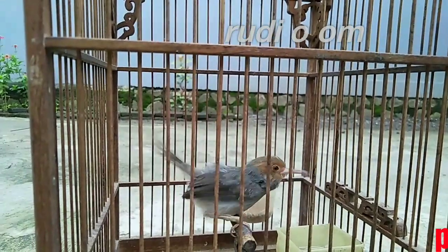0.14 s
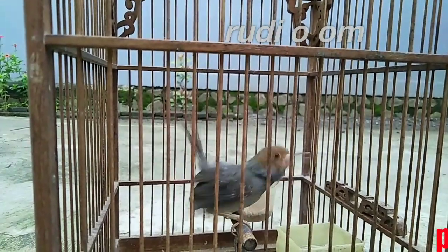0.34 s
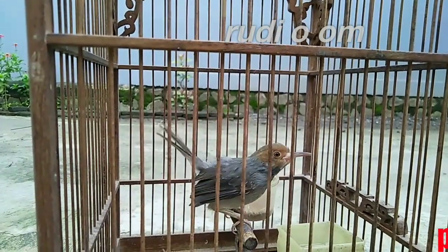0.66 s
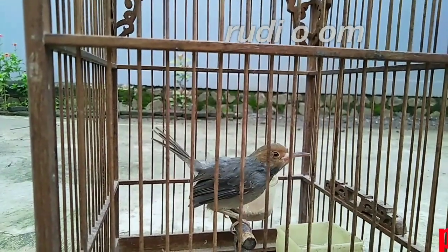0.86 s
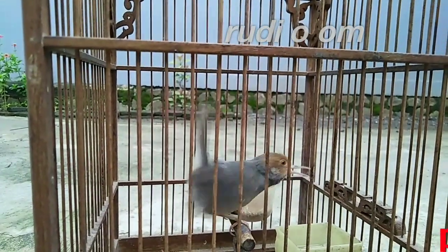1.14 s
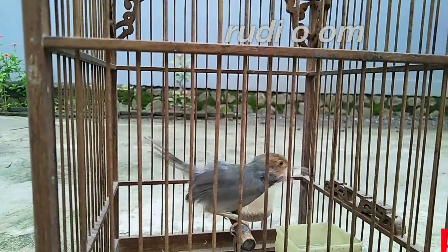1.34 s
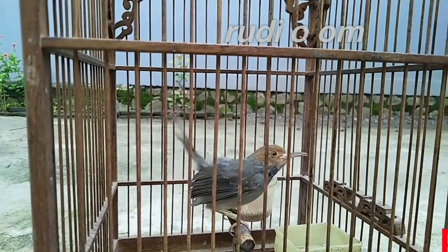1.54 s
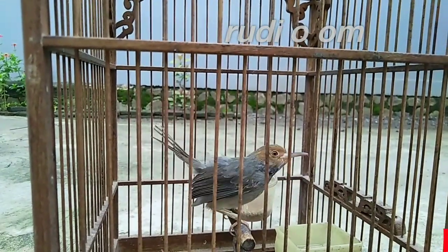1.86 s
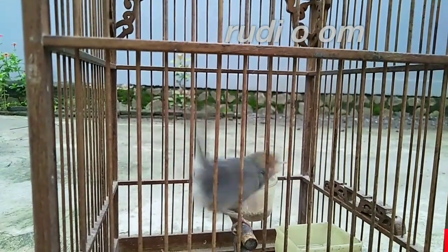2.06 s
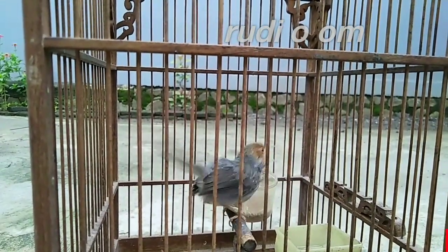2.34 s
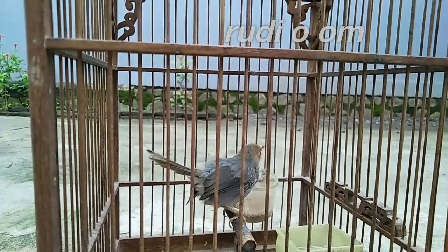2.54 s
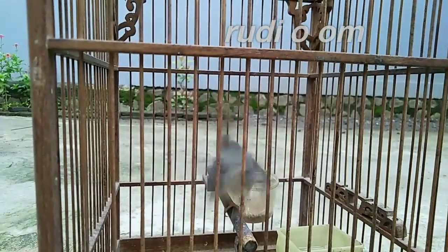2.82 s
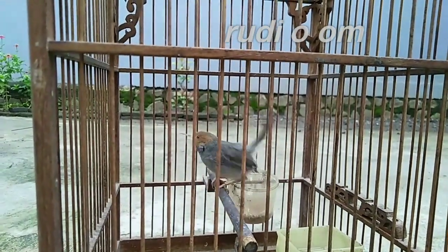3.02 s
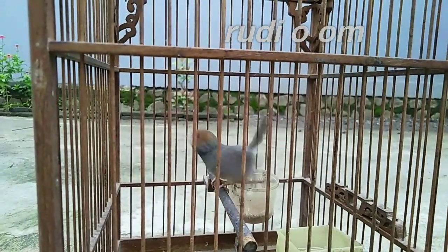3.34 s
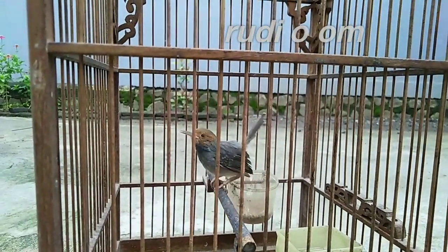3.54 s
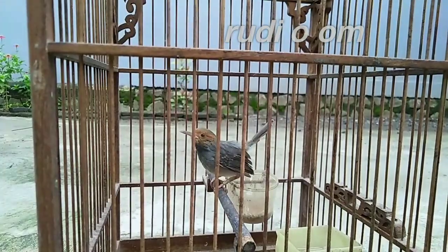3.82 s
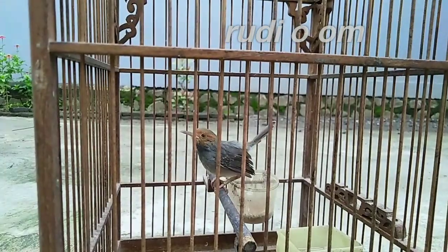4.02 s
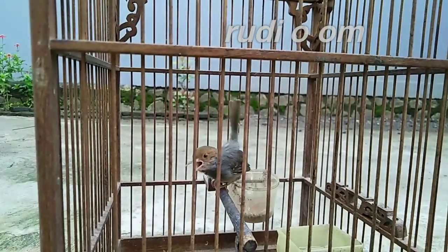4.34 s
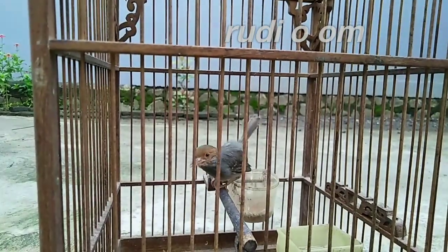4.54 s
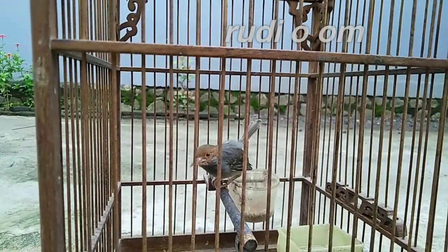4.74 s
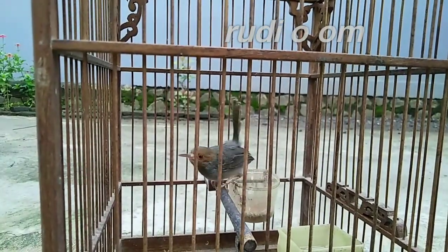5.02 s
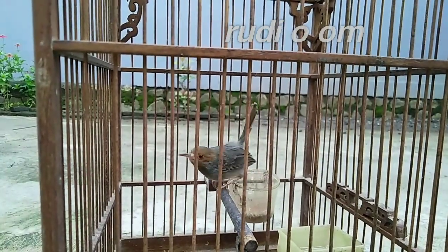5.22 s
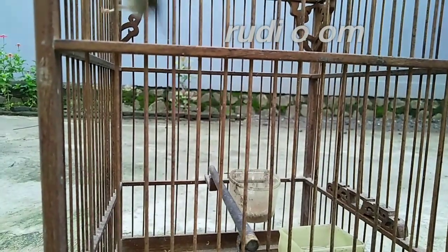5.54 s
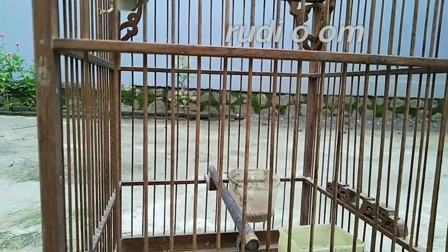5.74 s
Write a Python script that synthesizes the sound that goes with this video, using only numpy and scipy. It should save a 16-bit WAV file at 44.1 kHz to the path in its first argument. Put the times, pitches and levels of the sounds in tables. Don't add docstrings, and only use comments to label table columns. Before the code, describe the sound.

Outdoors in a paved yard, a phone picks up a small songbird near and bright. Its clean, whistled phrase comes five times, ticking first, then sweeping upward and snapping sharply down. Hoarse roosters crow far away under a thin steady cricket and low traffic-like rumble. Feathers rustle briefly midway; near the end only faint birds, a hen's yelp and tiny wing flutters remain.

```python
import sys
import numpy as np
from scipy import signal
from scipy.fft import rfft, irfft, next_fast_len
from scipy.io import wavfile
from scipy.ndimage import uniform_filter1d

SR = 44100
rng = np.random.default_rng(int(sys.argv[2]) if len(sys.argv) > 2 else 0)


def level_to_linear(level):
    exponent = np.asarray(level, float) / 20
    return 10 ** exponent


def inscribe(sig):
    pcm = np.round(np.clip(np.atleast_2d(sig).T, -1, 1) * 32767)
    wavfile.write(sys.argv[1], SR, pcm.astype(np.int16))


N = 259308


def colour(x, points):
    hz, db = np.transpose(points)
    size = next_fast_len(len(x))
    log_hz = np.log(np.maximum(np.fft.rfftfreq(size, 1 / SR), 1))
    gain = level_to_linear(np.interp(log_hz, np.log(hz), db))
    return irfft(rfft(x, size) * gain, size)[:len(x)]


def level(x, db):
    return x * level_to_linear(db) / np.sqrt(np.mean(x ** 2))


def walk(rate_hz, count=N):
    hold = max(int(SR / rate_hz), 32)
    draws = rng.standard_normal(size=count // 32 + 1)
    held = np.repeat(draws[:count // hold + 1], hold)
    slewed = uniform_filter1d(uniform_filter1d(held, hold), hold)
    return 1.6 * slewed[:count]


def add(out, start_s, piece):
    i = int(start_s * SR)
    piece, i = piece[max(-i, 0):], max(i, 0)
    out[i:i + len(piece)] += piece[:len(out) - i]


def edges(t, length, attack, release):
    ramp = np.minimum(t / attack, (length - t) / release)
    return np.sin(np.pi / 2 * np.clip(ramp, 0, 1)) ** 2


def glide(length_s, start_hz, end_hz, wobble=0):
    u = np.arange(int(length_s * SR)) / (length_s * SR)
    hz = start_hz + (end_hz - start_hz) * u
    hz = hz * (1 + wobble * walk(120, count=8192)[:len(u)])
    return np.sqrt(np.sin(np.pi * u)) * np.sin(2 * np.pi * np.cumsum(hz) / SR)


def note(law, effort, row, echoes, half_db, tops_db, rasp_db):
    # multiple of the pitch, level in dB.
    overtones = [(2, -29), (3, -29), (4, -44), (5, -29)]
    # multiple of the pitch, level in dB.
    half_lines = [(.5, -39.5), (1.5, -43.5), (2.5, -48.5), (3.5, -51), (4.5, -48.5)]
    # pitch sung in Hz, gain in dB.
    throat = [(1200, -19.5), (1700, -2.5), (2500, -1.5), (3000, 3), (3500, -0.84), (4200, 8.5), (4900, 4.5)]
    # frequency in Hz, gain in dB.
    rasp = [(2000, -18.5), (5000, -4.5), (8000, -1), (14000, -5.2)]
    start_hz, goal_hz, relax_ms, bend, sag_hz_per_ms = law
    lead_ms, length_ms, attack_ms, release_ms, shape_db = effort
    onset_s, note_db, pitch, stretch, swell_db = row
    length_ms = length_ms * stretch
    t_ms = np.arange(0, length_ms, 1000 / SR)

    def flicker(rate_hz):
        return walk(rate_hz, count=6000)[:len(t_ms)]

    relaxing = np.exp(-(t_ms / relax_ms) ** bend)
    sung_hz = pitch * (goal_hz + (start_hz - goal_hz) * relaxing - sag_hz_per_ms * t_ms)
    hz = sung_hz * (1 + 0.0033 * flicker(400))
    phase = 2 * np.pi * np.cumsum(hz) / SR
    force = edges(t_ms, length_ms, attack_ms, release_ms)
    force = force * level_to_linear(note_db + (shape_db + swell_db) * t_ms / length_ms)
    force = force * level_to_linear(np.interp(hz, *np.transpose(throat)) - 6.5)

    comb = 1
    for delay_ms, db in (echoes[:2], echoes[2:]):
        comb = comb + level_to_linear(db) * np.exp(-2j * np.pi * sung_hz * delay_ms / 1000)
    main = np.imag(comb * np.exp(1j * phase))

    tops = 0
    for k, db in overtones + [(k, db + half_db) for k, db in half_lines]:
        below_top = k * hz < .45 * SR
        tops = tops + level_to_linear(db + tops_db + 4.9 * flicker(160)) * np.sin(k * phase) * below_top
    air = level(colour(rng.standard_normal(size=6000), rasp), rasp_db)[:len(t_ms)]
    return onset_s - lead_ms / 1000, force * (main + tops + air)


def beak_snaps():
    # start in seconds, peak level in dB.
    snaps = [(0.099, -26), (0.1137, -20), (0.1294, -35.5), (1.146, -24.5), (1.1612, -19), (1.1759, -22),
             (2.165, -31.5), (2.1803, -24.5), (2.1949, -24), (3.1312, -29.5), (3.1496, -26),
             (3.1635, -28.5), (4.2351, -26), (4.2502, -23), (4.2657, -22.5)]
    # frequency in Hz, level in dB, t60 in seconds.
    modes = [(1560, -9.5, .006), (2185, -5.5, .006), (4220, -1, 0.0063), (5946, 13, 0.0022),
             (6250, -1, 0.0077), (7600, -13.5, 0.0069), (14660, -12.5, .003)]
    out = np.zeros(N)
    t = np.arange(0, .012, 1 / SR)
    chance = rng.standard_normal((len(snaps), len(modes), 2))
    for (start_s, peak_db), draws in zip(snaps, chance):
        ring = 0
        for (hz, db, t60_s), (a, b) in zip(modes, draws):
            mode = np.sin(2 * np.pi * hz * (1 + 0.028 * b) * t)
            ring = ring + level_to_linear(db + 4 * a - 60 * t / t60_s) * mode
        add(out, start_s + 0.00044, level_to_linear(peak_db) * ring / np.max(np.abs(ring)))
    return out


def songbird():
    # onset in seconds, level in dB, pitch factor, length factor, swell to the end in dB.
    chips = [(0.199, -19, 1.013, 0.96, 2), (1.25, -18, 0.99, 0.98, 0.5), (2.2606, -20.5, 1.01, 1.02, -5),
             (3.2191, -19, 1.001, 1.001, 0.1), (4.3359, -19, 1.05, 1.001, -4)]
    holds = [(0.2488, -17, 0.99, 1.001, 1.5), (1.3011, -15.5, 1.001, 1.001, 1.2),
             (2.3104, -19, 1.001, 1.074, -2.4), (3.2695, -18, 1.01, 1.007, -1.5), (4.3848, -17, 1, 1.1, 1)]
    peeps = [(0.3508, -12, 0.995, 0.95, -2.7), (1.4025, -14.5, 1.001, 0.95, 0.3),
             (2.415, -11, 0.995, 1.001, -1.5), (3.372, -23, 1.02, 1.4, 11), (4.4911, -12, 0.99, 1.01, 0)]
    slides = [(0.3851, -12, 0.98, 0.988, -0.8), (1.4358, -11.5, 0.99, 0.89, -0.8),
              (2.4478, -14.5, 0.98, 1.04, 1.2), (3.405, -12.5, 1.012, 0.8, 2),
              (4.5272, -11.5, .98, 0.97, -3)]
    # start in Hz, goal in Hz, relaxation in ms,
    # bend exponent, sag in Hz per ms.
    pitch_laws = [
        (3900, 1500, 11, 1.01, .1),
        (1250, 3800, 11, 1.3, 7),
        (4190, 3990, 1.7, 1.01, .8),
        (4875, 3000, 24, 1.5, 6),
    ]
    # lead before the onset in ms, length in ms, attack in ms, release in ms, swell in dB.
    efforts = [
        (3.3, 23.3, 2.6, 3.3, 4),
        (14, 87.8, 4.5, 35, 7),
        (3.6, 21, 3.1, 9, -4),
        (3, 65.4, 1.2, 9.6, -6.5),
    ]
    half_db = [-24, 0.5, -8.5, -9]
    tops_db = [-8, -6.6, -0.5, 0]
    rasp_db = [-31, -43, -41.5, -34]
    # delay in ms, level in dB, delay in ms, level in dB.
    reflections = [(1.298, -12, 1.8, -13.5), (0.774, -10.5, 1.334, -14), (1.338, -4, 2.105, -6.5),
                   (0.662, -8.5, 0.31, -6), (0.76, -13, 0.899, -10.5)]
    out = beak_snaps()
    kinds = zip(pitch_laws, efforts, (chips, holds, peeps, slides), half_db, tops_db, rasp_db)
    for law, effort, rows, *voice in kinds:
        for row, echoes in zip(rows, reflections):
            add(out, *note(law, effort, row, echoes, *voice))
    return out


def crow(row, octave_db, scoop, scoop_s):
    # multiple of the pitch, level in dB.
    upper = [(3, -23), (4, -24)]
    edge_s = 0.032
    start_s, length_s, start_hz, end_hz, call_db = row
    t = np.arange(0, length_s, 1 / SR)

    def flicker(rate_hz):
        return walk(rate_hz, count=50000)[:len(t)]

    hz = start_hz + (end_hz - start_hz) * (t / length_s) ** 2
    hz = hz * (1 - scoop * np.exp(-t / scoop_s))
    hz = hz * (1 + .03 * flicker(110) + 0.017 * flicker(12))
    phase = 2 * np.pi * np.cumsum(hz) / SR
    voice = 0
    for k, db in [(1, 0.00089), (2, octave_db)] + upper:
        voice = voice + level_to_linear(db + 3.5 * flicker(50)) * np.sin(k * phase)
    force = level_to_linear(call_db + 2.2 * flicker(6.4)) * edges(t, length_s, edge_s / 2, edge_s)
    return start_s, np.sqrt(2) * force * voice


def far_birds():
    # start in seconds, length in seconds, pitch in Hz, end pitch in Hz, level in dB.
    crows = [(-.2, 0.37, 478.5, 469, -64.5), (0.338, 0.18, 509.5, 450, -65.5),
             (0.934, 0.56, 791, 740, -70.5), (1.459, .99, 722.6, 711.6, -63),
             (2.488, .86, 747, 625.6, -67.5), (3.401, 0.81, 560, 539, -87.5)]
    crow_octave_db = [-1.5, 3.5, 2.5, -5, 3.5, 3.5]
    yelp = (5.008, .13, 1270, 1250, -64)
    # start in
    # seconds, length in seconds, start in Hz, end in Hz, level in dB.
    whistles = [(0.488, 0.011, 3006, 2970, -40.5), (0.527, 0.041, 2270, 1787, -49),
                (0.835, 0.0545, 9700, 9446, -77.5), (0.842, 0.0564, 14140, 13600, -88.5),
                (1.891, .08, 2120, 2226, -75), (2.732, .08, 1770, 1870, -67.5),
                (4.93, 0.142, 3871, 4320, -73.5), (5.579, 0.0117, 1245, 1266, -57),
                (5.616, 0.0208, 1530, 1846, -63.5), (5.623, 0.1476, 3900, 4040, -73),
                (5.749, 0.076, 9190, 9180, -74), (5.753, .08, 13370, 13500, -74)]
    out = np.zeros(N)
    for row, octave_db in zip(crows, crow_octave_db):
        add(out, *crow(row, octave_db, scoop=0.12, scoop_s=.06))
    add(out, *crow(yelp, octave_db=-1.5, scoop=.4, scoop_s=.045))
    for start_s, length_s, start_hz, end_hz, db in whistles:
        add(out, start_s, level_to_linear(db) * glide(length_s, start_hz, end_hz, wobble=0.0082))
    return out


def cricket():
    # place in chirp periods, length in ms, start in Hz, end in Hz, level in dB.
    strokes = [(.78, 19, 7200, 6313, -4), (.96, 19, 7200, 6106, -3.5), (1.04, 14, 6459, 6140, -2.5),
               (1.19, 14, 7000, 6500, -5.5)]
    cricket_db, chorus_hz, chorus_db = -63, 6800, -74.5
    chirps_at_start, chirps_per_s, slowing_per_s2 = .04, 9.06, .048
    s = np.arange(N) / SR
    count = chirps_at_start + chirps_per_s * s - slowing_per_s2 * s ** 2 / 2
    chorus_band = [(chorus_hz / 1.2, -30), (chorus_hz, 0), (chorus_hz * 1.3, -22)]
    out = level(colour(rng.standard_normal(N), chorus_band), chorus_db)
    chance = rng.standard_normal((int(count[-1]) + 1, len(strokes), 2))
    for k, draws in enumerate(chance):
        for (place, length_ms, start_hz, end_hz, db), (a, b) in zip(strokes, draws):
            when = k - 1 + place
            if count[0] < when < count[-1]:
                stroke = glide(length_ms / 1000, start_hz * (1 + 0.0053 * b), end_hz)
                add(out, np.interp(when, count, s), level_to_linear(db + 1.9 * a + cricket_db) * stroke)
    return out


def feathers():
    # start in seconds, rise in seconds, decay in seconds, level in dB.
    rustles = [(2.735, 0.018, 0.0292, -54), (5.41, 0.0175, 0.0408, -69.5), (5.56, 0.0098, 0.073, -67.5),
               (5.645, 0.0058, 0.0151, -63)]
    # frequency in Hz, density in dB per Hz.
    spectrum = [(2940, -60), (5590, -45), (5900, -17), (6220, -25), (7670, -6), (9510, -22), (14700, -13),
                (16000, -28)]
    t = np.arange(N) / SR
    grains = rng.standard_normal(N) * level_to_linear(2.27 * walk(260))
    hiss = level(colour(grains, spectrum), 0)
    swell = 0
    for start_s, rise_s, decay_s, db in rustles:
        rise = np.clip((t - start_s) / rise_s, 0, 1)
        decay = np.exp(-np.maximum(t - start_s - rise_s, 0) / decay_s)
        swell = swell + level_to_linear(db) * rise * decay
    return hiss * swell


def town():
    # frequency in Hz, density in dB per Hz.
    spectrum = [(22, -18.5), (54, 3), (85, -9), (230, -16), (310, -25), (2500, -32.5), (5500, -42.5),
                (14700, -44)]
    # time in seconds, level in dB.
    slow_swell = [(0, 1), (1.0, 0), (1.8, 2), (3.1, 1), (4.4, -1), (5.9, 0.8)]
    noise = colour(rng.standard_normal(N), spectrum)
    swell_db = np.interp(np.arange(N) / SR, *np.transpose(slow_swell))
    out = 0
    for hz in 30 * 2. ** np.arange(10):
        octave = [(hz / 2, -40), (hz / 1.5, -6), (hz / 1.3, 0), (hz * 1.3, 0), (hz * 1.5, -6), (hz * 2, -40)]
        wander_db = 1.7 * walk(1.3) + 0.52 * walk(7.8)
        out = out + colour(noise, octave) * level_to_linear(swell_db * min(2500 / hz, 1) + wander_db)
    return level(out, -56)


def yard(x, near_db, wet_db):
    # band centre in Hz, t60 in seconds, level in dB.
    walls = [(1510, 0.46, -26), (3230, 0.397, -25), (7000, 0.14, -22.5), (14000, 0.16, -15.5)]
    scatter_t60_s = 0.03
    t = np.arange(int(.7 * SR)) / SR
    scatter = rng.standard_normal(len(t)) * level_to_linear(-60 * t / scatter_t60_s) * (t > .001)
    response = level(scatter, near_db)
    for hz, t60_s, db in walls:
        band = [(hz / 3, -30), (hz / 1.4, 0), (hz * 1.4, 0), (hz * 3, -30)]
        echo = level(colour(rng.standard_normal(len(t)), band), 0)
        echo = echo * level_to_linear(-60 * t / t60_s) * np.minimum(t / 0.012, 1)
        response = response + level(echo, db + wet_db)
    return x + signal.fftconvolve(x, response / np.sqrt(len(t)))[:N]


def scene():
    # frequency in Hz, gain in dB.
    mic = [(5000, 0.5), (8000, 6.5), (10800, -18), (12500, 0.5), (14300, 17), (15800, 8.5)]
    scatter_db = -7.5
    drop_from_db, drop_slope, drop_s = -26, 2.4, .025
    near = colour(yard(songbird(), scatter_db, 0), mic)
    back = yard(far_birds(), scatter_db, 13) + town()
    loud_db = 10 * np.log10(uniform_filter1d(near ** 2, int(drop_s * SR)) + 1e-9)
    lost = 1 - level_to_linear(-drop_slope * np.maximum(loud_db - drop_from_db, 0))
    back = back - lost * colour(back, [(250, -60), (450, 0)])
    mix = near + back + yard(cricket(), scatter_db, 4.1) + feathers()
    return mix[None]


def roll_off(x):
    return signal.sosfilt(signal.butter(12, 16620, fs=SR, output="sos"), x)


def record(dry):
    low_pass = signal.ellip(8, .2, 60, 16000, fs=SR, output="sos")
    cut = signal.sosfilt(low_pass, dry)
    return roll_off(cut)


dry = scene()
out = record(dry)
inscribe(out)
```